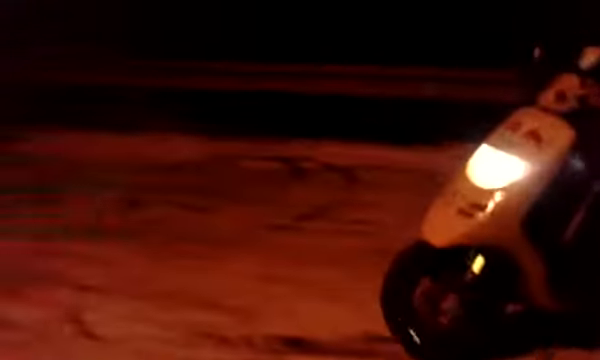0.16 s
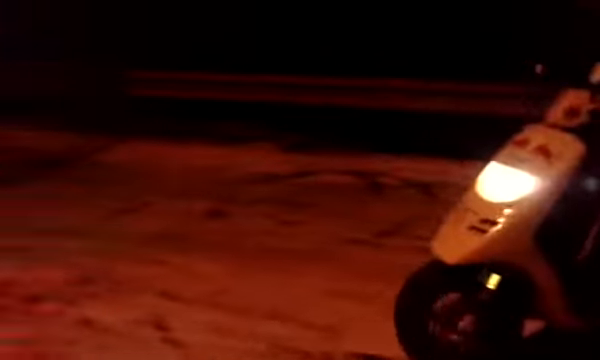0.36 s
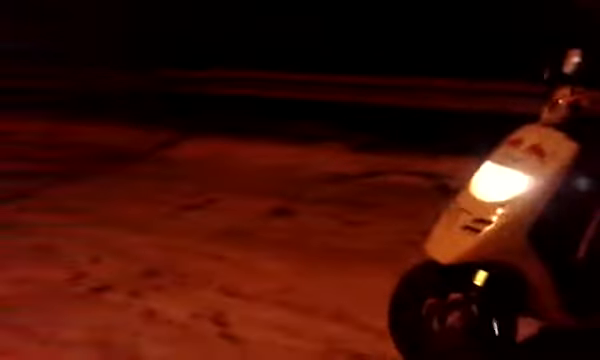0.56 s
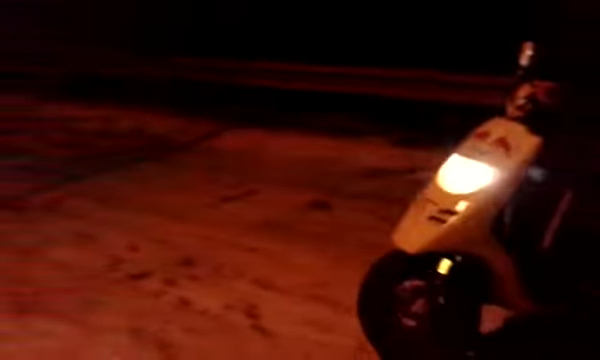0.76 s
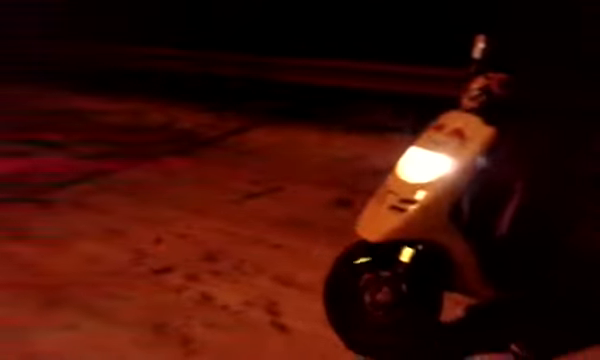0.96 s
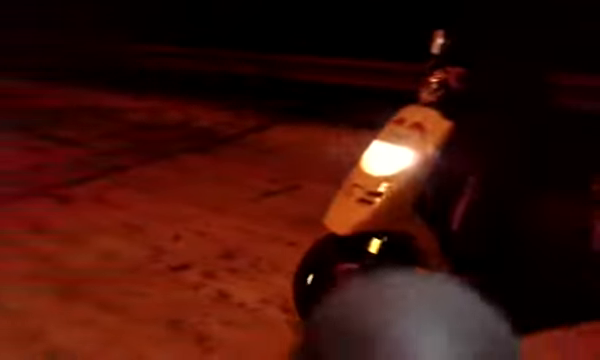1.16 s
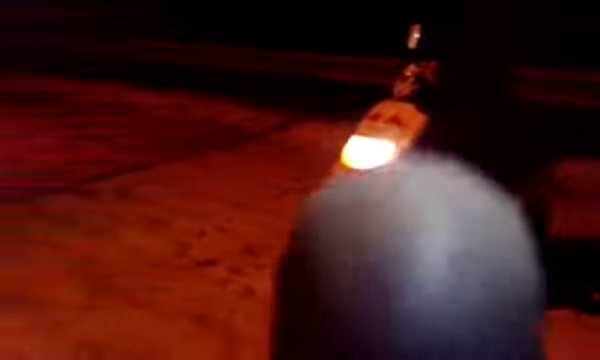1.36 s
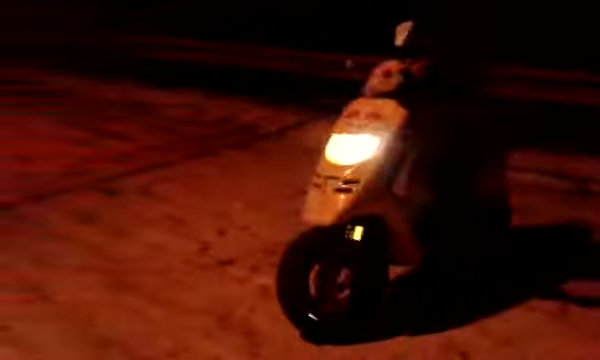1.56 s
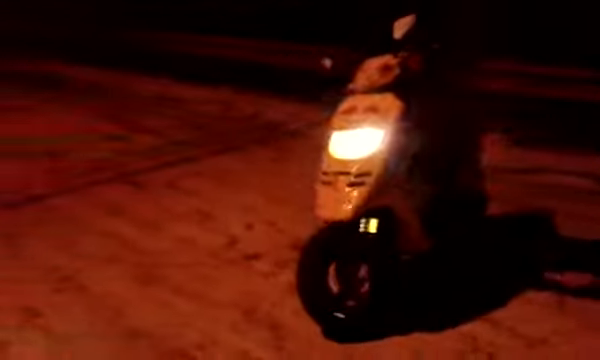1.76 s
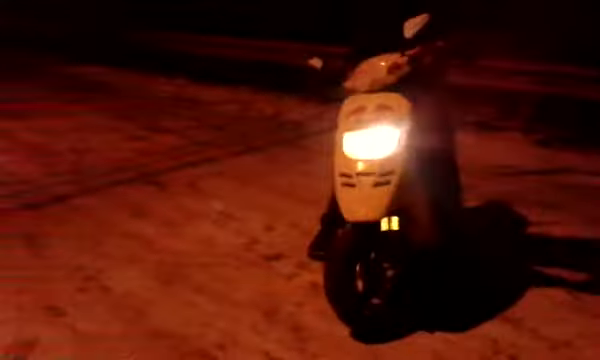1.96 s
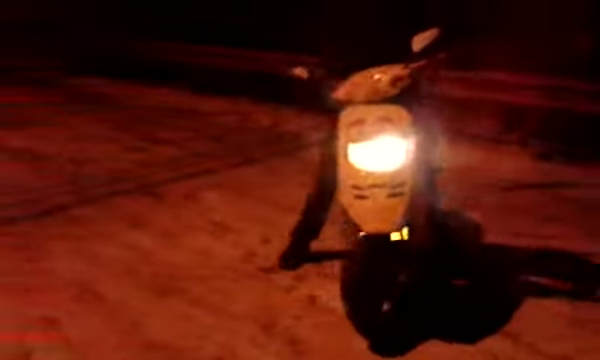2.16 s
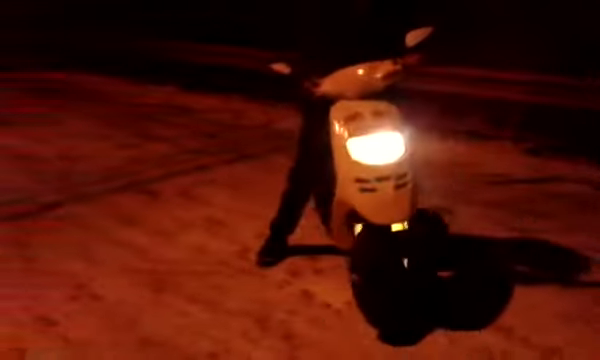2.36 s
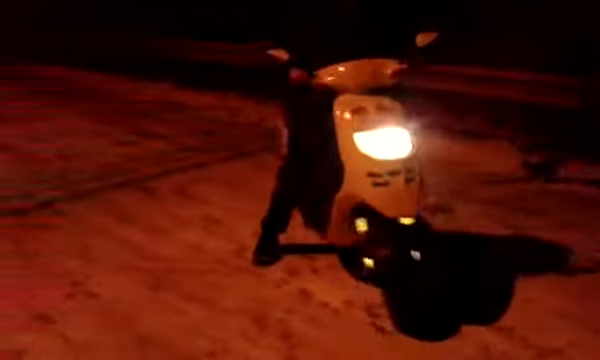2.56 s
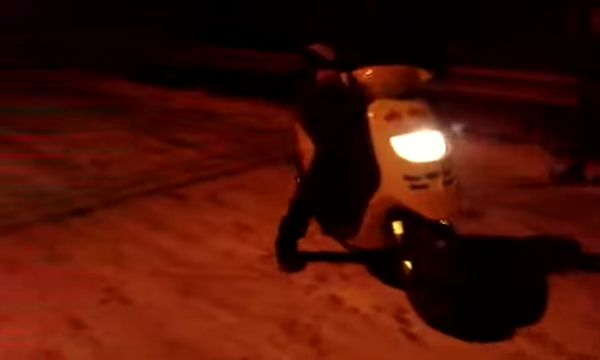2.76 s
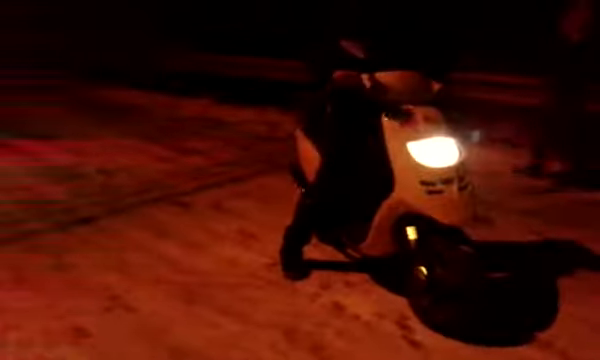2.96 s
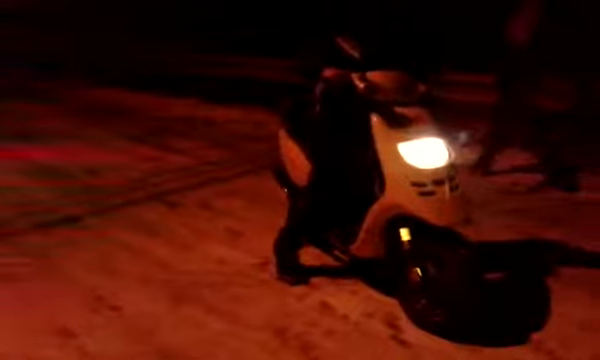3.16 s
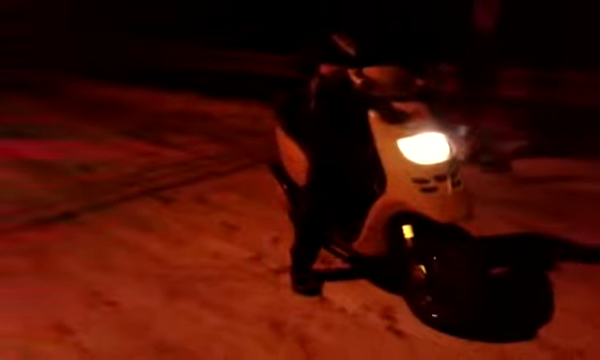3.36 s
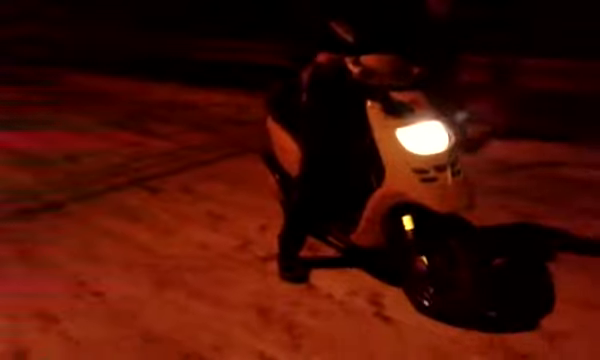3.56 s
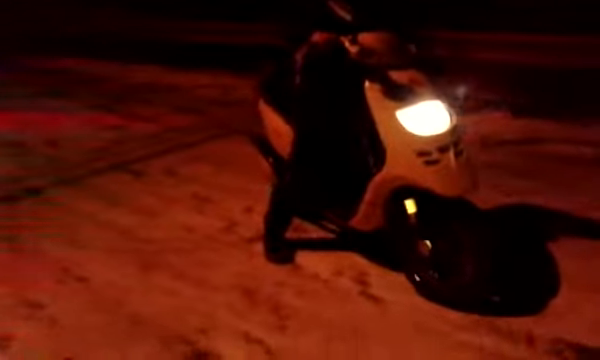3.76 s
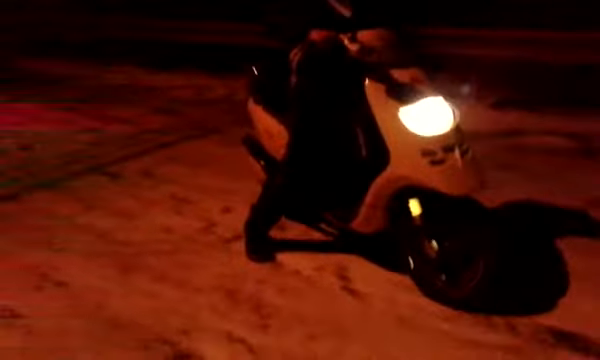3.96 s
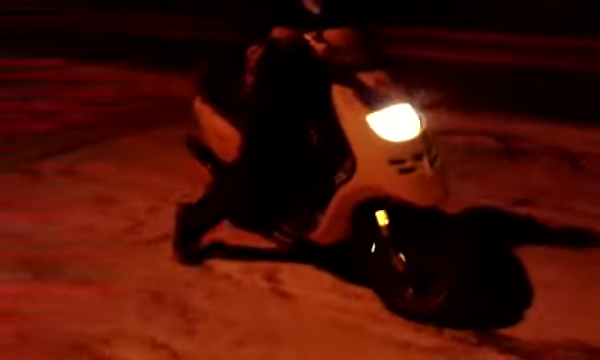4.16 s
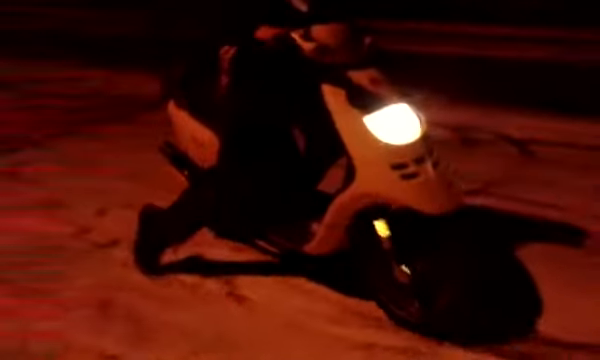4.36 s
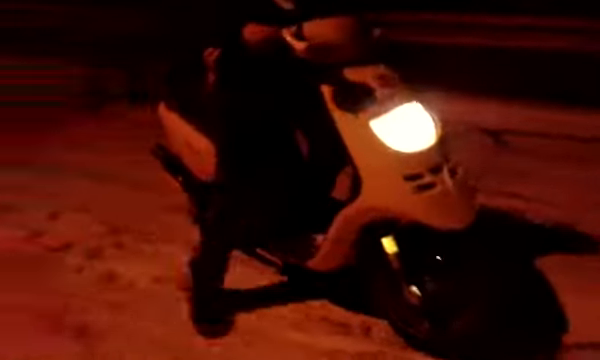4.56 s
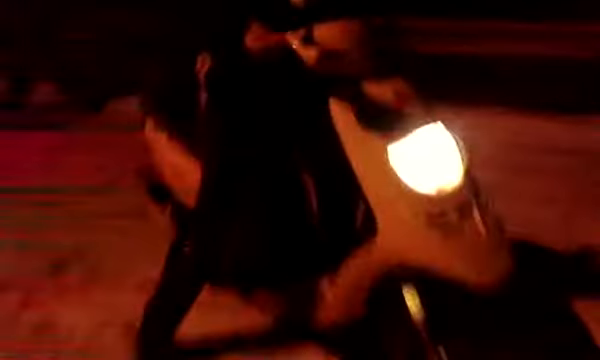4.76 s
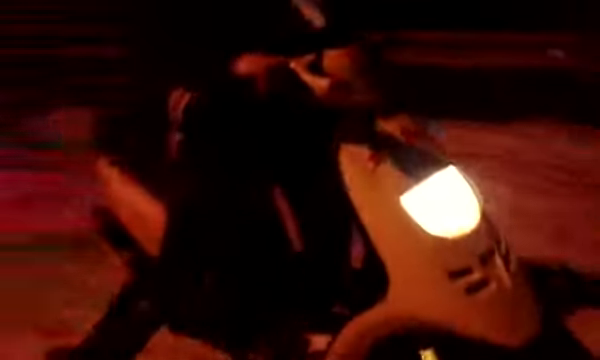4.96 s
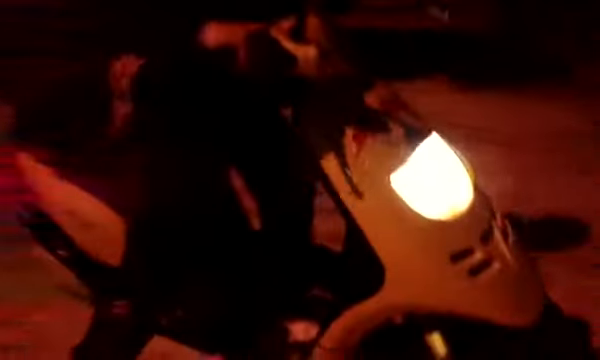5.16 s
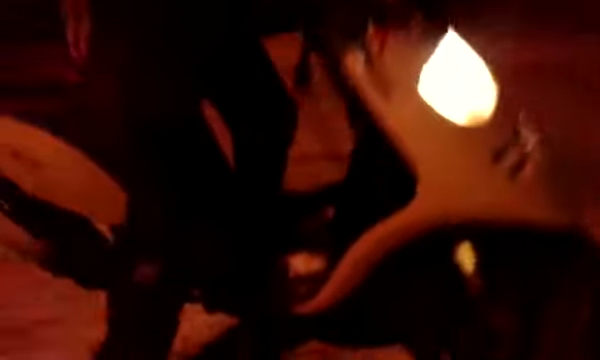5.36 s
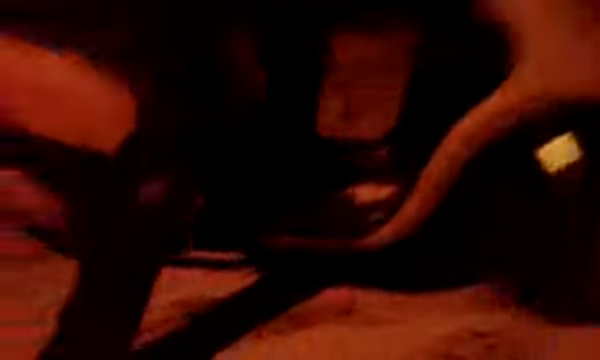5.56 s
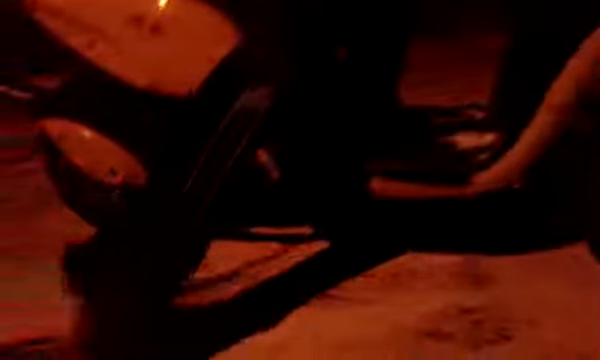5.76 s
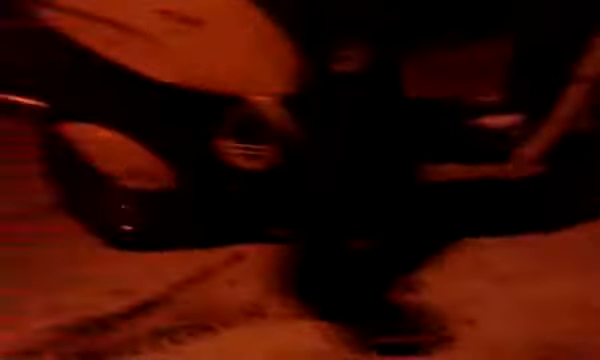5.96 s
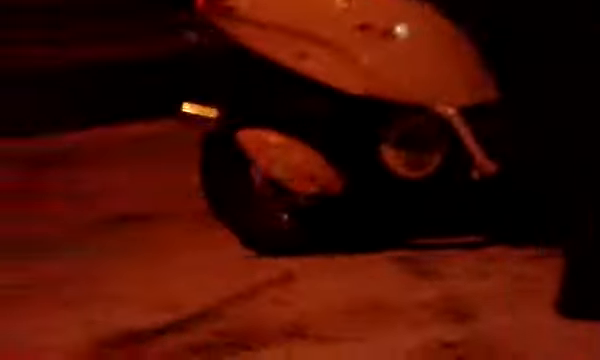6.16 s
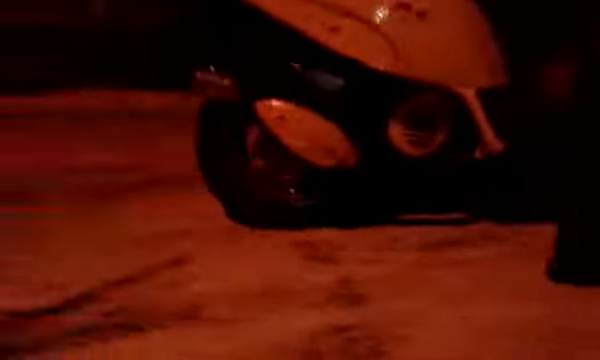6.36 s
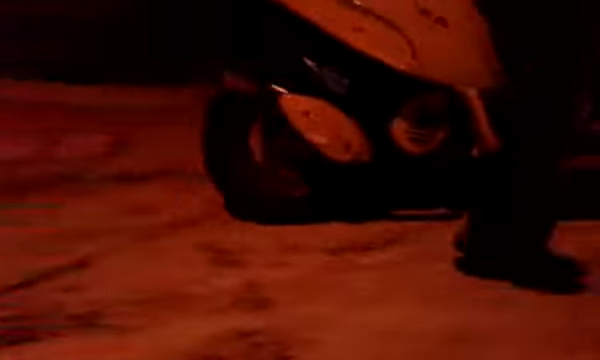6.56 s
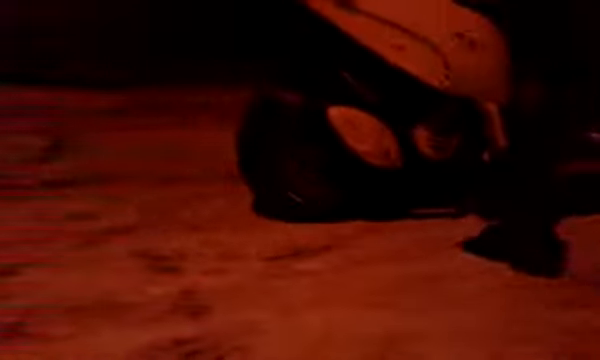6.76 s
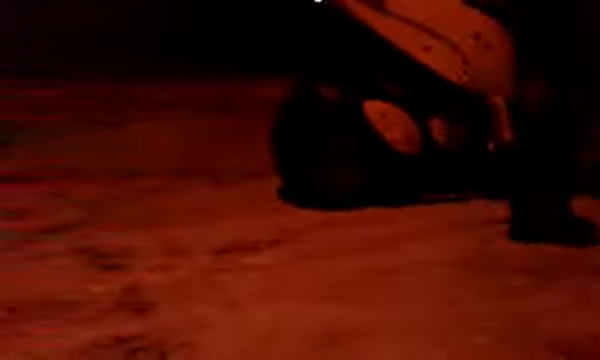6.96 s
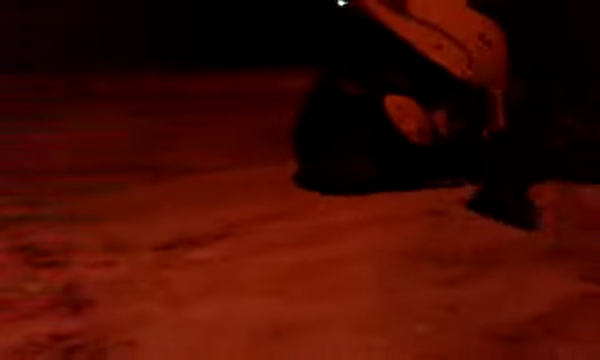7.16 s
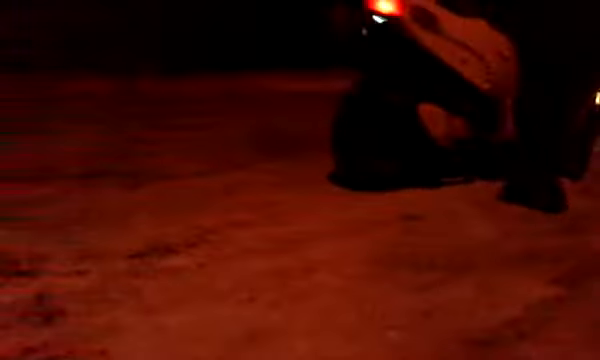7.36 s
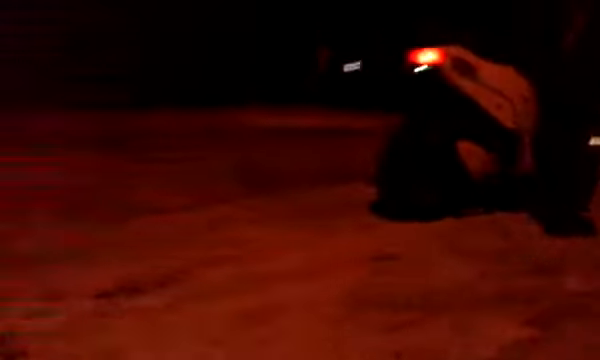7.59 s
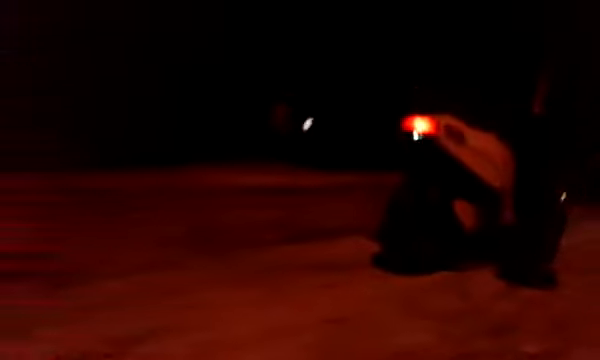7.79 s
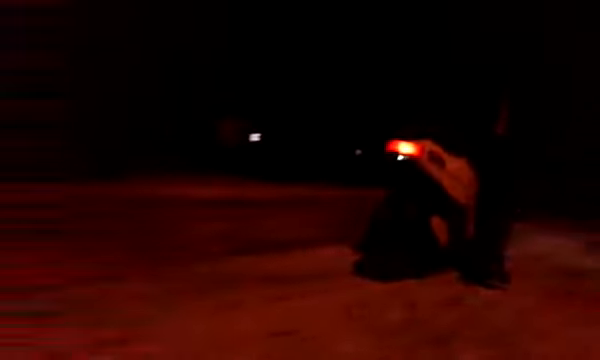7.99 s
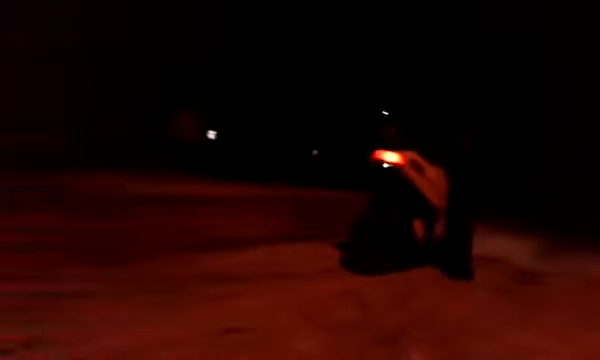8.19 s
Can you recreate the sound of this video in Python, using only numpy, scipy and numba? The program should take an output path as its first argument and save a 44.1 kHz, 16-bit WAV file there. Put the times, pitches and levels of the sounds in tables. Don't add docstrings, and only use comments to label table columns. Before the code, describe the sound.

A small two-stroke scooter buzzes and revs close by at night, pops off-throttle, then rasps loudly past and pulls away.

```python
import sys
import numpy as np
from scipy import signal
from scipy.fft import rfft, irfft
from scipy.io import wavfile
from scipy.ndimage import uniform_filter1d
from numba import njit

SR = 44100
rng = np.random.default_rng(int(sys.argv[2]) if len(sys.argv) > 2 else 0)


def waveform_to_disk(signal):
    frames = np.transpose(np.atleast_2d(signal))
    scaled = np.clip(frames, -1, 1) * 32767
    samples = np.round(scaled).astype(np.int16)
    wavfile.write(sys.argv[1], SR, samples)


def volts_from_db(level):
    exponent = np.asarray(level, float) / 20
    return 10 ** exponent


N = 362935

# t/s, exhaust rattle level/dB, engine block level/dB, outlet treble level/dB
RIDE = [(0.0, -18.5, -27, -28.5), (0.5, -19, -27, -21), (1.05, -18, -27, -23), (1.4, -19, -27.5, -24.5),
        (1.75, -23.5, -28, -15), (2.2, -22.5, -27.5, -19.5), (2.601, -18, -26.5, -29),
        (2.95, -20, -24.5, -21.5), (3.25, -16.5, -26, -24), (4.2, -18, -26.5, -23),
        (4.75, -12.5, -23.5, -24), (5.05, -16.5, -24, -20), (5.7, -18.5, -24.5, -17),
        (6.2, -14.5, -21.5, -13.5), (6.649, -8, -20, -13), (7.2, -12, -20, -16.5), (7.7, -15.5, -23, -18),
        (8.23, -17.5, -24, -19.5)]
# t/s, firing rate f/Hz
ENGINE_SPEED = [(0.0, 72.1), (0.48, 85.6), (0.87, 90.77), (1.33, 78.7), (1.72, 78.04), (2.41, 94.68),
                (2.68, 96.6), (3.09, 76.33), (3.69, 77.9), (4.4, 83.38), (4.84, 82.17), (5.82, 52.28),
                (6.03, 51.9), (6.22, 58.86), (6.61, 90.26), (7.19, 73.65), (7.9, 79.75), (8.23, 80.04)]
# from t/s, firing resumes t/s, misfire level/dB
THROTTLE_SHUT = [
    (2.715, 3.098, -8),
    (4.883, 5.925, -22),
    (6.765, 7.068, -6),
]
# t/s, number of firings, first level/dB, other level/dB
CATCHING_RUNS = [(2.753, 3, 1, 2), (2.828, 2, 1, 2), (2.888, 2, 1, 2), (2.948, 2, 1, 2), (2.998, 3, 0, 2),
                 (3.059, 2, 1, 2), (4.924, 3, 1, 2), (5.0, 2, 0, 0), (5.067, 2, 4, 2), (5.135, 2, -7, 3),
                 (5.206, 2, 1, 2), (5.266, 2, -2, 3), (5.326, 2, 4, 3), (5.389, 2, 1, 0), (5.454, 2, 1, 1),
                 (5.52, 1, 5, 0), (5.554, 1, 4, 0), (5.589, 1, 5, 0), (5.624, 1, 6, 0), (5.659, 1, 5, 0),
                 (5.696, 1, 5, 0), (5.734, 1, 6, 0), (5.771, 3, 0, -9), (5.828, 2, 1, 1), (5.886, 1, 3, 0),
                 (6.779, 3, 1, 1), (6.841, 3, 2, 2), (6.901, 2, 2, 2), (6.951, 2, 2, 2), (7.002, 3, 2, 2)]
# from t/s, crack delay t/s, crack level/dB, tail t/s, rise t/s
FIRING_SHAPE = [
    (0, .004, 6, .0035, .0015),
    (3.1, .005, -4, .002, .001),
    (4.3, .004, 3, .004, .002),
    (4.9, .004, -2, .0035, .0004),
    (6.1, .005, -6, .009, .002),
    (6.9, .005, -6, .005, .0015),
]

# f/Hz, width f/Hz, level/dB
FRONT = [(1373, 31, -1.5), (1772, 51, 0.5), (2140, 66, 4), (2754, 75, 9), (3290, 86, -4), (4640, 130, -2)]
TURNING = [(1882, 42, 4), (2490, 83, 1.5), (3057, 49, -0.5), (3322, 93, 4.5), (3540, 170, 2.5),
           (4140, 61, -9)]
QUARTER = [(1864, 49, 5.5), (2084, 114, 6.5), (2456, 62, 0), (2707, 120, 2), (3280, 100, 2.5),
           (5000, 250, -5.5)]
SWINGING = [(1904, 54, -6.5), (2130, 160, 1), (2520, 82, -0.5), (2784, 150, 5), (3296, 52, 5.5),
            (4390, 66, -1), (4840, 260, -3.5)]
CLOSING = [(1885, 50, 3), (2140, 34, -2.5), (2776, 80, 0.5), (3335, 90, 1.5), (4700, 300, -6.5)]
SIDE_ON = [(2000, 700, -6), (3850, 450, 0), (4750, 500, 0), (5830, 700, -7)]
PULLING = [(2300, 280, 0.5), (2905, 160, 0.5), (3893, 180, 5), (4700, 300, -2.5), (5330, 200, 2)]
FLAT_OUT = [(1700, 64, 3), (2224, 99, -2), (2670, 48, 3.5), (3330, 240, -0.5), (3780, 40, -4),
            (4540, 180, -6)]
PASSING = [(2070, 60, -14), (2490, 160, 3), (2798.4, 90, 7), (3140, 90, 0), (3670, 51, 0.5),
           (4620, 170, -1.5)]
RECEDING = [(1740, 60, -2.5), (2150, 78, 0.5), (2460, 67, -3), (2710, 60, -5.5), (3270, 77, 5),
            (3670, 270, -8.5), (4550, 120, 2)]
REAR = [(2045, 40, 2.5), (2600, 320, -16), (3110, 120, 5.5), (3720, 3100, -5), (4630, 810, -8.5)]
# leaving one t/s, reaching the next t/s
POSE_CHANGES = [
    (1.55, 2.24),
    (2.65, 2.8),
    (3.4, 3.47),
    (4.1, 4.23),
    (4.95, 5.2),
    (5.85, 6.07),
    (6.42, 6.55),
    (6.8, 7.15),
    (7.35, 7.67),
    (7.7, 7.86),
]
# f/Hz, level/dB per Hz
EXHAUST_COLOUR = [(59, -75.5), (100, -47), (240, -28), (286, -23.5), (609, -2.5), (1030, -0.5),
                  (1430, -2.5), (2520, -2.5), (2770, -1.5), (3060, -3.5), (4690, -3), (6040, -14.5),
                  (10400, -27.5), (13500, -72), (22000, -120)]
# f/Hz, level/dB per Hz
FAN_COLOUR = [(59, -72), (100, -17), (455, -11), (587, -9), (820, -11.5), (1600, -1), (2240, -2.5),
              (2520, -6), (3310, -5), (3730, -4), (4910, -9), (8860, -32.5), (11000, -87), (14300, -106),
              (22000, -120)]

# f/Hz, level/dB
HUM_AHEAD = [(41, -36), (80, -28.5), (170, -10), (240, 1), (315, -7.5), (390, -12.5), (632, 5.5),
             (1000, -15), (1300, 0), (1690, -24), (2860, -120)]
# f/Hz, level/dB
HUM_BEHIND = [(41, -62), (70, -22), (188, -27), (270, -19.5), (375, 4.5), (480, -5.5), (602, -3), (705, -3),
              (769, -2.5), (847, -13), (1300, -23), (1690, -37.5), (2860, -120)]
# from t/s, to t/s, multiple, level/dB
SINGING = [(0.0, .9, 8, 4.5), (0.5, 0.37, 9, 7.5), (.45, .85, 7, 0.5), (1, 1, 4, -3.5), (0.4, 0.91, 16, 5),
           (0.3, 1.6, 15, 0.5), (0.8, 2.1, 20, 8.5), (1.27, 2.2, 9, 6.5), (1.6, 2.2, 7, -0.5),
           (2.04, 2.7, 4, 1.5), (2, 2.7, 6, 0.5), (4.5, 2.7, 7, 4), (2.1, 2.5, 8, 1.5), (2.5, 3.3, 9, 2.5),
           (3.5, 4.88, 5, -1), (3.55, 4.1, 12, 3.5), (4, 4.6, 15, -0.5), (4.5, 4.88, 6, 4), (4, 4.2, 8, 7),
           (4.5, 4.4, 9, 8), (4.5, 5.6, 11, 2.5), (4, 5.4, 14, 3), (0.5, 0.15, 5, 2.5), (0.4, 0.56, 6, -6),
           (.55, .9, 18, 3.5), (.3, 0.76, 11, -1), (-1.5, 1.45, 11, 0), (1.45, 1.75, 12, -1.5),
           (2.5, 2.7, 3, -5.5), (3.5, 2.72, 2, -4), (1.5, 2.72, 1, -12), (2.05, 2.4, 11, -1.5),
           (2.5, 2.65, 12, 1), (2, 3.1, 10, -0.5), (3.5, 4.15, 6, -1.5), (4.45, 4.88, 10, -4),
           (1.5, 1.4, 6, -9),
           (5.9, 6.8, 3, -12), (6.5, 6.9, 2, -12.5), (6.55, 6.9, 6, -1), (6.55, 6.85, 19, 11),
                (7.3, 7.75, 15, 2), (6.7, 8.23, 6, -3.5), (7.8, 7.5, 5, -4.5), (7.8, 7.3, 2, -7.5),
                (5.95, 6.3, 8, -3.5), (5.1, 6.4, 12, -5.5), (5.5, 5.8, 14, 1), (5.92, 6.3, 5, -7),
                (6.3, 6.9, 5, -7), (6.32, 7.0, 4, -2), (5.95, 6, 6, -13.5), (5.95, 6.85, 7, -2),
                (5.6, 6.4, 10, -6), (6.5, 6.85, 11, 2), (6.52, 5.6, 17, 3.5), (3.1, 2.3, 7, 6),
                (2.3, 2.5, 5, 0.5), (6.53, 6.8, 16, 11.5), (7.1, 7.6, 9, -3), (7.1, 7.9, 10, -1),
                (6.5, 7.5, 12, -1.5), (7.5, 8.23, 14, -4)]

# t/s, level/dB against the rattle
OUTLET_SNAP = [
    (0, -20),
    (2.9, -18),
    (3.15, -12),
    (3.6, -9),
    (4.0, -9),
    (4.35, -16),
    (4.9, -14),
    (5.9, -13),
    (6.3, -24),
    (8.23, -20),
]
# t/s, level/dB above the calm
GUSTS = [(0.3, 2), (0.939, 2), (1.3, -1), (2.149, 4), (2.5, 8), (4.331, 2), (4.72, -1), (5.09, 9),
         (5.3, 13), (5.69, 16.5), (6.05, 17), (6.33, 23), (6.69, 23), (6.902, 16), (7.15, 11), (7.29, 12)]
# t/s, f/Hz, level/dB against the fan
BELT_COVER = [(4.8, 1800, -14), (5.21, 1570, -6.5), (5.49, 1486, -3.5), (5.71, 1360, 1.5),
              (5.85, 1700, -3.5), (6.48, 1720, -5), (6.56, 1545, -5), (6.95, 1405, -9), (7.15, 1690, -4),
              (7.19, 1720, -13), (7.24, 1725, 0.5), (7.33, 1700, -4.5), (7.37, 1700, -14), (7.46, 1720, -6),
              (7.52, 1740, -22), (7.7, 1800, -19)]
# t/s, level/dB, ring f/Hz
CRACKS = [
    (5.741, -3.5, 5530),
    (7.775, -14, 3910),
]
# f/Hz, level/dB per cell
FAINT_LINE = [(6500, -100), (7500, -63.5), (8800, -67), (10300, -61.5), (11000, -67), (16000, -102)]

INERTIA_S = 0.0979
CRUISE_HZ = 80
HEAT = .2
# (t/s, level/dB), drift as a share of pitch
RING_FLICKER_DB, RING_DRIFT = ([5, 6], [1.8, 3.5]), .008
BOOM_DB, BARK_DB, WHIRR_DB = -8, 0.5, 3
BOOM_DB_PER_OCT, BARK_DB_PER_OCT, WHIRR_DB_PER_OCT = 6, 12, 0
# turning in, square on, leaving, gone (t/s); boom and bark gain
FLANK_S, FLANK_BOOM_DB, FLANK_BARK_DB = (4.9, 5.6, 6.1, 6.7), 3.5, 9
FLANK_WHIRR_DB = -4.5
SINGING_FADE_S = 0.045
SNAP_LATE_S, CRACK_S = .005, 0.0023
CALM_DB, GUST_S, FLUTTER_DB = -65, 0.092, 7


def level(x, db):
    return x * volts_from_db(db) / np.sqrt(np.mean(x ** 2))


def curve(s, v):
    return np.interp(np.arange(N) / SR, s, v)


def noise():
    return rng.standard_normal(N)


def band(x, lo_hz, hi_hz):
    return signal.sosfilt(signal.butter(3, [lo_hz, hi_hz], "band", fs=SR, output="sos"), x)


def walk(rate):
    k = int(SR / rate)
    steps = np.repeat(rng.standard_normal(N // k + 1), k)
    return uniform_filter1d(uniform_filter1d(steps, k), k)[:N]


def colour(x, table):
    hz, db = np.transpose(table)
    f = np.maximum(np.arange(1025) * SR / 2048, 1)
    cepstrum = irfft(np.interp(np.log(f), np.log(hz), db) * np.log(10) / 20)
    cepstrum[1:1024] *= 2
    cepstrum[1025:] = 0
    return signal.oaconvolve(x, irfft(np.exp(rfft(cepstrum))))[:N]


@njit
def ring(x, hz, width):
    y, b, l = np.empty(len(x)), 0., 0.
    for i in range(len(x)):
        g, k = np.tan(np.pi * hz[i] / SR), width / hz[i]
        v = (b + g * (x[i] - l)) / (1 + g * (g + k))
        b, l, y[i] = 2 * v - b, l + 2 * g * v, k * v
    return y


def clicks(s, size):
    out = np.zeros(N + 2)
    at = np.clip(s * SR, 0, N)
    i = at.astype(int)
    np.add.at(out, i, size * (1 - at + i))
    np.add.at(out, i + 1, size * (at - i))
    return out[:N]


def firings(hz):
    clock, turns = np.arange(N) / SR, np.cumsum(hz) / SR
    shut_s, resume_s, misfire_db = np.transpose(THROTTLE_SHUT)
    held = []
    for a, b in zip([0, *resume_s], [*shut_s, N / SR]):
        count = np.ceil(np.diff(np.interp([a, b], clock, turns))[0])
        held.append((a, count, -1, 0))
    runs = np.array(sorted(held + CATCHING_RUNS))
    first_turn = np.interp(np.append(runs[:, 0], N / SR), clock, turns)
    s, db = [], []
    for (t0, count, first_db, run_db), a, b in zip(runs, first_turn, first_turn[1:]):
        k = np.arange(max(round(b - a), 1))
        s.append(np.interp(a + k, turns, clock))
        caught_db = np.where(k, run_db, first_db)
        missed_db = np.interp(t0, shut_s, misfire_db)
        db.append(np.where(k < round(count), caught_db, missed_db))
    s, db = np.concatenate(s), np.concatenate(db)
    size_chance, time_chance = rng.standard_normal((2, len(s)))
    size = volts_from_db(db + 1.2 * size_chance) / np.sqrt(np.interp(s, clock, hz))
    return clicks(s + .00002 * time_chance, size), turns


def cluster(late_s, late_db, tail_s, rise_s, fresh):
    t = np.arange(len(fresh)) / SR
    tail = np.where(t < late_s, 1, np.exp((late_s - t) / tail_s))
    build = tail * np.minimum(.2 + t / rise_s, 1)
    crack = volts_from_db(late_db) * np.exp(-np.abs(t - late_s) / .0004)
    spiky = fresh * np.abs(fresh) ** .5
    return (build + crack) * spiky


def even(x, width=9):
    z = rfft(x, 2048)
    return irfft(z / np.sqrt(uniform_filter1d(np.abs(z) ** 2, int(width))))[:len(x)]


def rattle(pulses, morph_s=.4):
    t, out = np.arange(N) / SR / morph_s, np.zeros(N)
    shapes = rng.standard_normal((40, 900))
    for k in range(int(t[-1]) + 2):
        near = np.flatnonzero(np.abs(t - k) < 1)
        if len(near):
            fade = np.cos(np.pi / 2 * (t[near] - k))
            shape = [row[1:] for row in FIRING_SHAPE if row[0] <= k * morph_s][-1]
            one = level(even(cluster(*shape, shapes[k])), 0)
            part = signal.oaconvolve(pulses[near] * fade, one)[:N - near[0]]
            out[near[0]:near[0] + len(part)] += part
    puff = signal.oaconvolve(pulses, cluster(.003, -10, .006, .0006, np.ones(900)))[:N]
    flow = curve([6.05, 6.35, 6.75, 6.9], [0.36, 0.59, 0.81, 0.22]) * curve([7.3, 7.6], [1, .5])
    puff = puff + flow * (uniform_filter1d(puff, size=700) - puff)
    gas = level(puff * noise(), -9)
    return level(out, 0) + volts_from_db(curve([4.8, 5.2, 6.2, 7.3], [-7.5, 9, 6, -2])) * gas


def rings(x, modes, through_db, lift):
    out = volts_from_db(through_db) * x
    for hz, width, db in modes:
        strength = volts_from_db(db + curve(*RING_FLICKER_DB) * walk(14))
        out = out + strength * ring(x, hz * lift * (1 + RING_DRIFT * walk(6)), float(width))
    return level(out, 0)


def facing(x, lift):
    place = curve(np.ravel(POSE_CHANGES), (np.arange(20) + 1) // 2)
    poses = (FRONT, TURNING, QUARTER, SWINGING, CLOSING, SIDE_ON,
             PULLING, FLAT_OUT, PASSING, RECEDING, REAR)
    out = 0
    for k, modes in enumerate(poses):
        fade = np.clip(1 - np.abs(place - k), 0, 1) ** .5
        out = out + fade * rings(x, modes, -7, lift)
    return out


def fan_whirr(turns):
    beat = 1 + 0.2 * np.cos(2 * np.pi * turns)
    return level(colour(beat * volts_from_db(0.94 * walk(14)) * noise(), FAN_COLOUR), 0)


def hum(hz, turns):
    behind, out = curve([4.9, 5.9], [0, 1]), 0
    for k in range(1, 21):
        ahead_db, behind_db = (np.interp(np.log(k * hz), np.log(f), db)
                               for f, db in map(np.transpose, (HUM_AHEAD, HUM_BEHIND)))
        db = ahead_db + behind * (behind_db - ahead_db) + min(k / 2, 4) ** 2 / 4 * walk(5)
        sung = sum(volts_from_db(up_db) * curve([a - SINGING_FADE_S, a, b, b + SINGING_FADE_S], [0, 1, 1, 0])
                   for a, b, order, up_db in SINGING if round(order) == k)
        strength = volts_from_db(db) + sung * volts_from_db(1.2 * walk(7))
        out = out + strength * np.sin(2 * np.pi * k * turns + k * k)
    missing = sum(curve([a - .02, a, b, b + 0.011], [0, .55, .6, 0]) for a, b, _ in THROTTLE_SHUT)
    return (1 - missing) * out


def crankcase_boom(shaft, whirr, flank):
    return level(band(shaft, 105, 510), 1) + volts_from_db(4 * flank) * level(band(whirr, 130, 468), -9)


def crankcase_bark(shaft, whirr, exhaust):
    clear = volts_from_db(curve([1.8, 2.5, 3.1, 4.9, 5.2, 5.9, 6.8, 7.2], [2, 3, 0, 2, -10, 1, 1, 3.5]))
    bark = clear * level(band(shaft, 439, 2020), -3.5)
    return bark + level(band(whirr, 510, 1076), -3) + level(band(exhaust, 420, 947), -13.5)


def outlet_sizzle(exhaust, pulses, flank):
    blowing = uniform_filter1d(uniform_filter1d(pulses, size=500, origin=200), size=300)
    blowing = blowing * volts_from_db(4.9 * walk(9.1))
    hiss = level(band(blowing * noise(), 6240, 10000), -4)
    side_hiss = volts_from_db(2.5 * flank) * level(band(noise(), 7400, 10500), -15.0)
    return level(band(exhaust, 6620, 10240), -5.5) + side_hiss + hiss


def outlet_snap(pulses):
    late = np.roll(pulses, int(SNAP_LATE_S * SR))
    return volts_from_db(curve(*np.transpose(OUTLET_SNAP))) * level(band(late, 1550, 4700), 0)


def scooter():
    hz = uniform_filter1d(curve(*np.transpose(ENGINE_SPEED)), int(INERTIA_S * SR) + 1)
    s, *columns = np.transpose(RIDE)
    body_db, block_db, sizzle_db = (curve(s, c) for c in columns)
    octaves, block_db = np.log2(hz / CRUISE_HZ), block_db - body_db
    flank = curve(FLANK_S, [0, 1, 1, 0])
    boom_db = block_db + BOOM_DB + BOOM_DB_PER_OCT * octaves + FLANK_BOOM_DB * flank
    bark_db = block_db + BARK_DB + BARK_DB_PER_OCT * octaves + FLANK_BARK_DB * flank
    whirr_db = block_db + WHIRR_DB + WHIRR_DB_PER_OCT * octaves
    pulses, turns = firings(hz)
    exhaust = colour(facing(rattle(pulses), (hz / CRUISE_HZ) ** HEAT), EXHAUST_COLOUR)
    whirr = fan_whirr(turns)
    shaft = hum(hz, turns)
    fan = band(whirr, 720, 10400) + belt_cover(whirr, exhaust) + open_fan_side()
    out = level(band(exhaust, 1376, 7940), 0) - outlet_snap(pulses)
    out = out + volts_from_db(whirr_db) * fan
    out = out + volts_from_db(boom_db) * crankcase_boom(shaft, whirr, flank)
    out = out + volts_from_db(bark_db) * crankcase_bark(shaft, whirr, exhaust)
    out = out - volts_from_db(sizzle_db) * outlet_sizzle(exhaust, pulses, flank)
    return volts_from_db(body_db) * out


def wind():
    t = np.arange(N) / SR
    swells = [up_db * np.exp(-((t - s) / GUST_S) ** 2 / 2) for s, up_db in GUSTS]
    db = CALM_DB + np.max(swells, axis=0)
    return volts_from_db(db + FLUTTER_DB * walk(22)) * level(band(noise(), 33, 130), -3.5)


def belt_cover(whirr, exhaust):
    s, hz, db = np.transpose(BELT_COVER)
    alongside = curve([4.7, 4.95, 7.5, 7.8], [0, 1, 1, 0]) * volts_from_db(curve(s, db) + 4.4 * walk(22))
    from_fan = level(ring(whirr, curve(s, hz), 200.0), 0.38)
    from_exhaust = level(ring(exhaust, curve(s, hz), 120.), 0.0)
    return alongside * (from_fan + from_exhaust)


def open_fan_side():
    passing = curve([4.9, 5.1, 5.8, 6.0], [0, 1, 1, 0])
    return passing * level(band(noise(), 930, 2500), FLANK_WHIRR_DB)


def cracks():
    t, out = np.arange(N) / SR, np.zeros(N)
    hiss = noise()
    for s, db, hz in CRACKS:
        fade = (t > s) * np.exp(-np.abs(t - s) / CRACK_S)
        out += volts_from_db(db) * fade * level(band(hiss, 0.93 * hz, 1.0 * hz), 0)
    return out


def scene():
    return np.array([scooter() + cracks() + wind()])


def thin(x):
    f, _, z = signal.stft(x, SR, nperseg=1024)
    cells = np.abs(z[..., :512, :]) ** 2
    luck = volts_from_db(5 * rng.standard_normal((64, cells.shape[-1])))
    power = cells.reshape(len(x), 64, 8, -1).mean(axis=2) * luck
    power = np.repeat(power, 8, axis=1)
    line = volts_from_db(np.interp(f[:512], *np.transpose(FAINT_LINE), left=-200))
    z[..., :512, :] *= power > line[:, None] ** 2
    return signal.istft(z, SR, nperseg=1024)[1][..., :N]


def low_pass(x):
    return signal.sosfilt(signal.butter(12, 15830, fs=SR, output="sos"), x)


def record(dry):
    top, knee, top_hz = .71, 7, 10600
    x = signal.sosfilt(signal.ellip(6, .5, 60, top_hz, fs=SR, output="sos"), dry)
    flat = x / (1 + np.abs(x / top) ** knee) ** (1 / knee)
    overload = flat - x
    below = signal.sosfiltfilt(signal.butter(8, top_hz, fs=SR, output="sos"), overload)
    added = below + volts_from_db(-10) * (overload - below)
    added = added - signal.sosfiltfilt(signal.butter(2, 150, fs=SR, output="sos"), added)
    mix = thin(x + added)
    return low_pass(mix)


dry = scene()
out = record(dry)
waveform_to_disk(out)
```